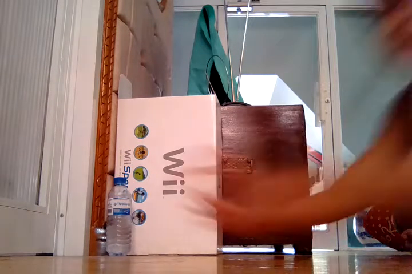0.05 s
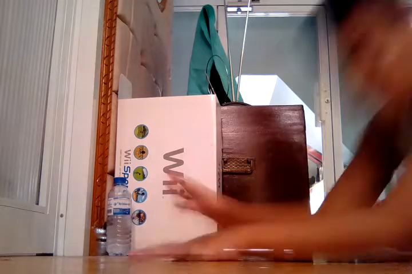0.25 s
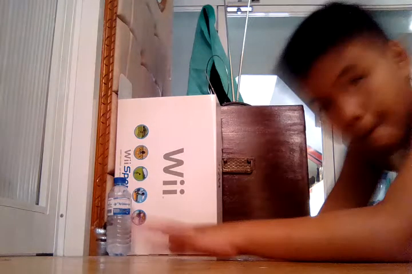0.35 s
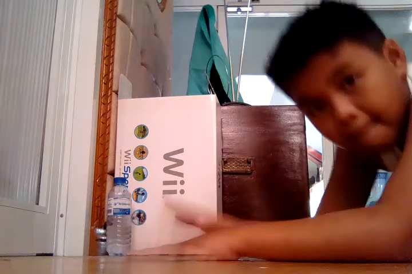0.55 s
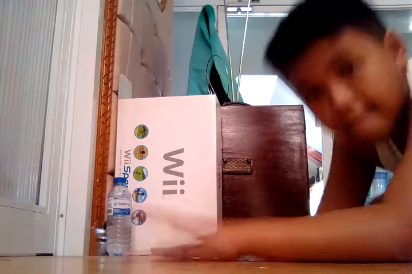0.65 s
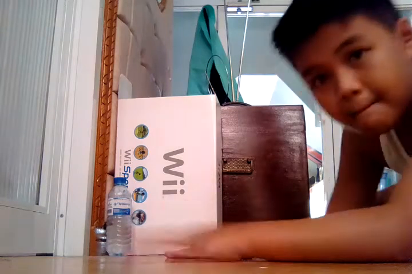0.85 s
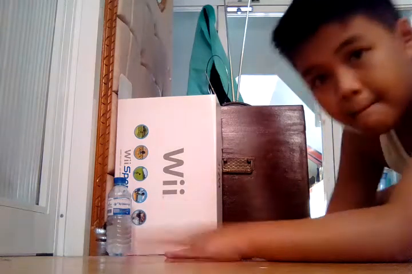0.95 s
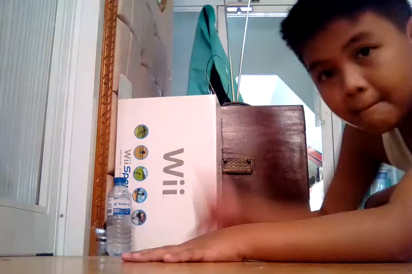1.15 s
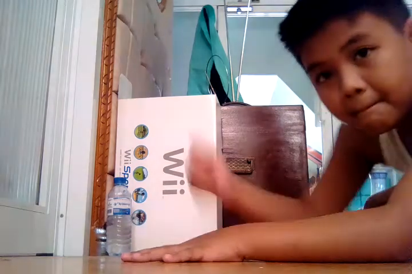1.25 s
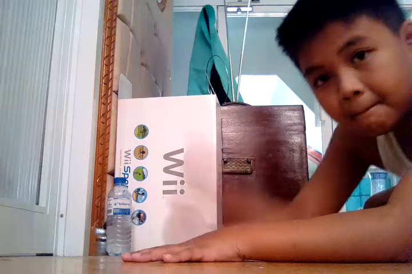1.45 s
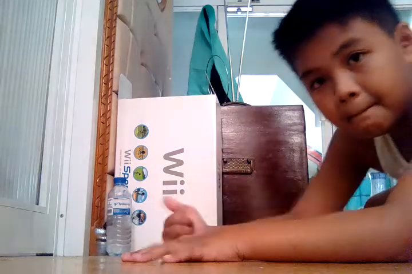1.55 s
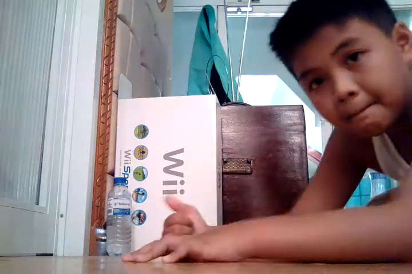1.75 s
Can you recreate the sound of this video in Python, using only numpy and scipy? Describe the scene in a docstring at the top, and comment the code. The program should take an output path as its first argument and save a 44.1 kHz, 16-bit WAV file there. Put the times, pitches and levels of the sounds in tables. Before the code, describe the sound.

Two hands pat a wooden floor seven times, quick and uneven, with low knocks and light skin slaps. After a pause comes one softer pat. The microphone is close, in a small bare room with steady hiss.

```python
"""Over a steady hiss, a faint brush; then two hands pat a wooden floor close to a microphone that stands
on it: seven quick uneven pats, a pause, one softer pat. Each hand knocks the boards in two contacts a few
milliseconds apart, with a tick of skin and a pop of air under the palm; a low thud follows the first pat
and the last. A small bare room answers. A look-ahead compressor ducks just before each hard pat and lets
the room swell back after it."""
import sys
import numpy as np
from scipy import signal
from scipy.fft import rfft, irfft, next_fast_len
from scipy.io import wavfile
from scipy.ndimage import uniform_filter1d, minimum_filter1d

SR = 44100
rng = np.random.default_rng(int(sys.argv[2]) if len(sys.argv) > 2 else 0)


def file_out(sig):
    """Save sig as 16-bit WAV at sys.argv[1]."""
    # one column per channel
    cols = np.atleast_2d(sig).T
    # limit, then scale
    lim = np.clip(cols, -1, 1)
    pcm = np.round(lim * 32767).astype(np.int16)
    wavfile.write(sys.argv[1], SR, pcm)


N = 79380

# Tone of the steady hiss: frequency_hz, relative_db
HISS_SPECTRUM = [(25, -16), (55, -6), (90, 9), (150, 7.5), (240, 11.5), (380, 0), (600, 2.5), (900, 1),
                 (1750, 2), (2500, -6.5), (4200, -14), (8500, -21), (13700, -32.5)]
# A hand or knee brushing the boards: centre_s, half_width_s, rub_db, hiss_db
BRUSH_STROKES = [(0.1, 0.068, -38, -45.5), (0.232, 0.0017, -5, -12.5), (0.35, 0.035, -23, -33.5),
                 (1.5, 0.0048, -15.5, -30.5)]
# Low rub of a brush: frequency_hz, relative_db
RUB_SPECTRUM = [(50, -48), (120, 11.5), (200, -20), (300, 14.5), (400, -6), (700, 3), (3000, -114.5)]
# Skin on varnish, sliding or ticking: frequency_hz, relative_db
SKIN_SPECTRUM = [(500, 12.5), (2000, 9), (3800, 2.5), (5000, -2.5), (7000, -1.5), (9500, -8.5),
                 (12000, -24.5), (16000, -33)]
# One hand landing per row: start_s, knock_db, bass_db, upper_db, pitch_ratio, gap_s, second_db,
# clap_db, pop_hz, skin_db, room_db (bass and upper are relative to the knock, second to the first contact)
HAND_PATS = [(.2388, 11, -1, -3, 0.92, 0.00185, -8.5, -4, 2110, -6, -8.5),
             (.3846, 18, -2.5, -1.5, 1.13, 0.0076, -15.5, -7, 2410, -0.5, -1.5),
             (0.472, 8.5, 7, 4, 1.008, 0.00344, -2, -2.5, 2230, -4, -5.5),
             (0.6223, 15.5, -2, -6.5, 0.978, 0.0048, -24, -19, 2650, -3, -4),
             (.6990, 18, -3, 2.5, 0.981, 0.00341, -15, 2, 2410, 2.5, -4),
             (0.8625, 14.5, -3.5, 2, 0.93, 0.0031, -8.5, -1.5, 2170, -2.5, -4.5),
             (1.0000, 10.5, 0, -6, 0.97, .0034, -12, -17, 2150, -14.5, -8.5),
             (1.4872, -3.5, -2.5, -6, 0.966, 0.00246, 2, -15, 2195, -16, -6.5)]
# Modes of the floorboards: pitch_hz, level_db, t60_s
BOARD_MODES = [(85.2, -31.5, 0.28), (175.7, -8, 0.049), (283.6, -9.5, 0.041), (394.8, -7.5, 0.053),
               (527.2, -6, .036), (621, -14, 0.032), (792, -8, 0.021), (887, -10, 0.016),
               (1182, -11, 0.0075), (1596, -22.5, 0.02)]
# Noisy part of the palm's clap: frequency_hz, relative_db
CLAP_SPECTRUM = [(300, -25), (700, 14), (1200, 6.5), (1750, 3.5), (2300, -17), (3000, -19), (6000, -50),
                 (14000, -28)]
# Reverb time of the bare room: frequency_hz, t60_s
ROOM_DECAY = [(100, 0.34), (400, .48), (1200, 0.29), (4000, 0.61), (10000, 0.3)]
# Tone of the room's tail: frequency_hz, gain_db
ROOM_EQ = [(40, -33), (85, 2), (150, 2.5), (300, -3.5), (600, -3.5), (1200, 5), (2400, -7.5), (5000, 24.5),
           (12000, -42)]
# Soft landings of the heel of the hand or the forearm: start_s, level_db
SOFT_LANDINGS = [(.268, -8), (1.493, -10)]
# The whole floor booming under that weight: pitch_hz, level_db, t60_s
BOOM_MODES = [(87.2, -6, 0.3), (151.6, -4, 0.23), (202, -7, 0.18)]

BASS_HZ, KNOCK_HZ, UPPER_HZ = 200, 420, 850  # anchors of each knock's tone curve
BEND_TRAVEL_S = 0.001977  # travel time of a bending wave at KNOCK_HZ
CONTACT_S, MODE_SCATTER_DB = 0.0007, 1.5
THRESHOLD_DB, SQUEEZE = -7, 0.64  # SQUEEZE: share of the overshoot to cut
LOOK_AHEAD_S, DUCK_S, RELEASE_DB_PER_S = 0.048, 0.014, 90


def amp(db):
    """Decibels to gain."""
    return 10 ** (np.asarray(db) / 20)


def curve_at(points, hz):
    """Read a curve of (frequency_hz, value) points on a log frequency axis."""
    freqs, values = np.transpose(points)
    return np.interp(np.log(hz + 1), np.log(freqs + 1), values)


def filtered(x, response):
    """EQ x with a gain that is a function of frequency."""
    size = next_fast_len(N + SR // 2)
    return irfft(rfft(x, size) * response(np.fft.rfftfreq(size, 1 / SR)), size)[:N]


def noise(spectrum):
    """Coloured noise of rms 1."""
    x = filtered(rng.standard_normal(N), lambda hz: amp(curve_at(spectrum, hz)))
    return x / x.std()


def since(start_s):
    """Seconds after start_s, for every sample."""
    return np.arange(N) / SR - start_s


def fade(t, t60_s):
    """Decay by 60 dB in t60_s."""
    return np.exp(-np.log(1000) * t / t60_s)


def ring(start_s, hz, t60_s, attack_s):
    """One damped mode, struck at start_s."""
    t = np.maximum(since(start_s), 0)
    return np.sin(2 * np.pi * hz * t) * fade(t, t60_s) * (1 - np.exp(-t / attack_s))


def burst(peak_s, spectrum, rise_s, t60_s):
    """Noise that swells up to peak_s and dies away."""
    t = since(peak_s)
    return noise(spectrum) * np.exp(np.minimum(t, 0) / rise_s) * fade(np.maximum(t, 0), t60_s)


def room_hiss(level_db):
    """A steady bed of dark noise."""
    return amp(level_db) * noise(HISS_SPECTRUM)


def brushes():
    """Short slides over the boards: a low rub and a hiss of skin swell and fade together."""
    rub, hiss = noise(RUB_SPECTRUM), noise(SKIN_SPECTRUM)
    slides = np.zeros(N)
    for centre_s, half_width_s, rub_db, hiss_db in BRUSH_STROKES:
        swell = np.exp(-(since(centre_s) / half_width_s) ** 2 / 2)
        slides += swell * (amp(rub_db) * rub + amp(hiss_db) * hiss)
    return slides


def skin_tick(start_s):
    """Skin ticks on the varnish and leaves a faint tail in the room."""
    tick = burst(start_s, SKIN_SPECTRUM, rise_s=0.0018, t60_s=0.02)
    tail = burst(start_s, SKIN_SPECTRUM, rise_s=0.0018, t60_s=0.46)
    return amp(-2) * (tick + amp(-20.5) * tail)


def palm_clap(start_s, pop_hz):
    """The air pocket under the palm pops: a puff of noise and a short pitched ring."""
    puff = burst(start_s, CLAP_SPECTRUM, rise_s=0.001, t60_s=0.018)
    pop = ring(start_s, pop_hz, t60_s=0.011, attack_s=0.0005)
    return amp(-1) * puff + amp(4) * pop


def board_knock(start_s, bass_db, upper_db, pitch_ratio, gap_s, second_db):
    """Two contacts ring the boards; bending waves bring the higher modes in sooner."""
    touch = [(BASS_HZ, bass_db), (KNOCK_HZ, 0), (UPPER_HZ, upper_db)]
    knock = np.zeros(N)
    for k, (hz, mode_db, t60_s) in enumerate(BOARD_MODES):
        arrival_s = start_s + BEND_TRAVEL_S * (np.sqrt(KNOCK_HZ / hz) - 1)
        first = ring(arrival_s, hz * pitch_ratio, t60_s, CONTACT_S)
        second = ring(arrival_s + gap_s, hz * pitch_ratio, t60_s, CONTACT_S)
        gain = amp(mode_db + curve_at(touch, hz) + MODE_SCATTER_DB * rng.standard_normal())
        knock += (-1) ** k * gain * (first + amp(second_db) * second)  # modes alternate in polarity
    return knock


def pat(start_s, knock_db, bass_db, upper_db, pitch_ratio, gap_s, second_db,
        clap_db, pop_hz, skin_db, room_db):
    """One hand lands: knock and clap feed the room, with the skin tick layered on top."""
    knock = amp(knock_db) * board_knock(start_s, bass_db, upper_db, pitch_ratio, gap_s, second_db)
    clap = amp(clap_db) * palm_clap(start_s, pop_hz)
    return in_room(knock + clap, room_db) + amp(skin_db) * skin_tick(start_s)


def in_room(x, send_db, build_s=0.0017):
    """A sound plus the room's answer, which differs for each spot on the floor."""
    hz, t, bands = signal.stft(rng.standard_normal(SR), SR, nperseg=512)
    tail = signal.istft(bands * fade(t, curve_at(ROOM_DECAY, hz)[:, None]), SR)[1]
    tail = filtered(tail / np.linalg.norm(tail), lambda f: amp(curve_at(ROOM_EQ, f)))
    tail *= 1 - np.exp(-since(0) / build_s)
    return x + amp(send_db) * signal.fftconvolve(x, tail)[:N]


def thuds(push_hz=135, push_t60_s=0.12, attack_s=0.0041):
    """Soft flesh lands with a low push and the floor booms on."""
    modes = [(push_hz, 0, push_t60_s)] + list(BOOM_MODES)
    return sum(amp(level_db + mode_db) * ring(start_s, hz, t60_s, attack_s)
               for start_s, level_db in SOFT_LANDINGS for hz, mode_db, t60_s in modes)


def scene():
    """Pats, thuds and brushes over the room's steady hiss, in mono."""
    pats = sum(pat(*row) for row in HAND_PATS)
    hands = pats + in_room(thuds(), send_db=-16) + brushes()
    return (hands + room_hiss(level_db=-40.5))[None]


def compressor(x):
    """The gain ducks ahead of each loud peak and climbs back at a steady rate."""
    level_db = 20 * np.log10(np.abs(x) + 1e-9)
    cut_db = SQUEEZE * np.maximum(level_db - THRESHOLD_DB, 0)
    half_window = int(LOOK_AHEAD_S * SR) // 2
    coming_cut_db = -minimum_filter1d(-cut_db, 2 * half_window + 1, origin=-half_window)
    climb_db = RELEASE_DB_PER_S * since(0)
    released_cut_db = np.maximum.accumulate(coming_cut_db + climb_db) - climb_db
    return x * amp(-uniform_filter1d(released_cut_db, int(DUCK_S * SR)))


def record(dry):
    """Low cut, compressor, hard clip at full scale and a brick-wall top cut."""
    low_cut_hz, top_hz = 76, 13835
    low_cut = signal.butter(2, low_cut_hz, "highpass", fs=SR, output="sos")
    ducked = compressor(signal.sosfilt(low_cut, dry[0]))
    return filtered(np.clip(ducked, -1, 1), lambda hz: hz < top_hz)[None]


dry = scene()
out = record(dry)
file_out(out)
```